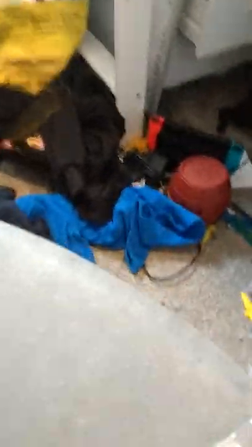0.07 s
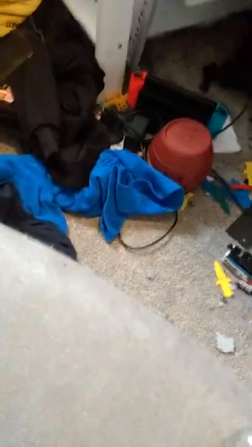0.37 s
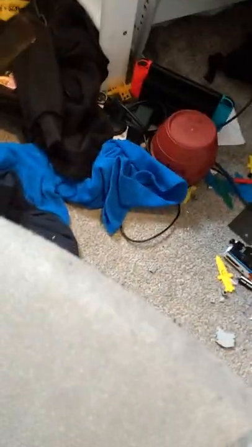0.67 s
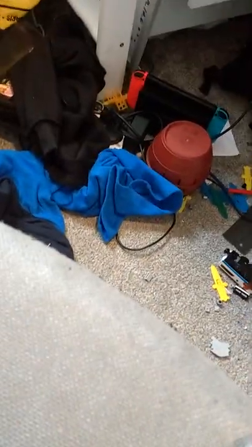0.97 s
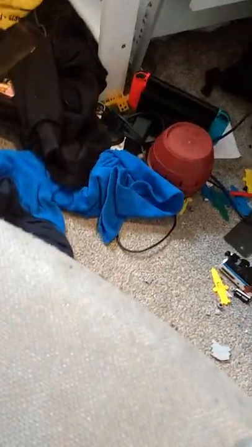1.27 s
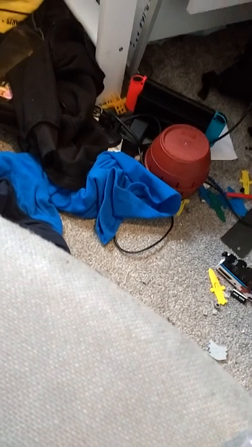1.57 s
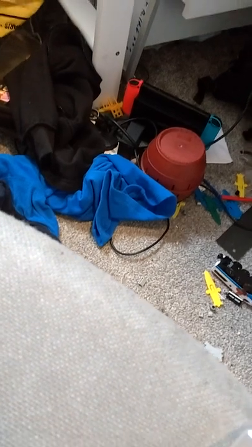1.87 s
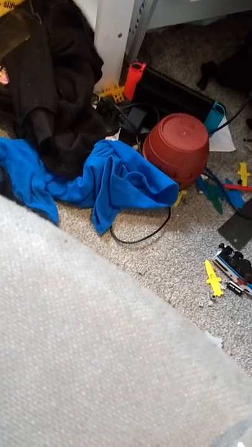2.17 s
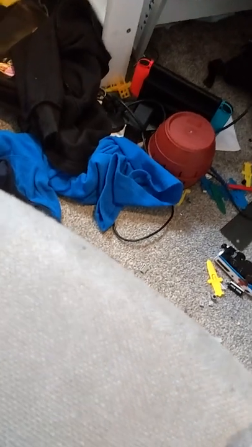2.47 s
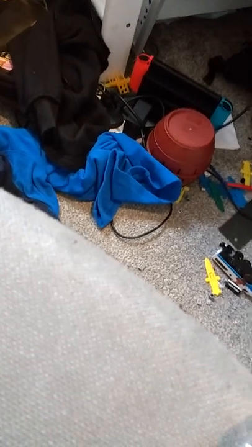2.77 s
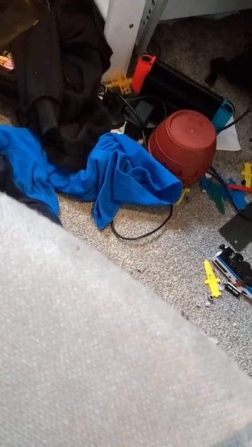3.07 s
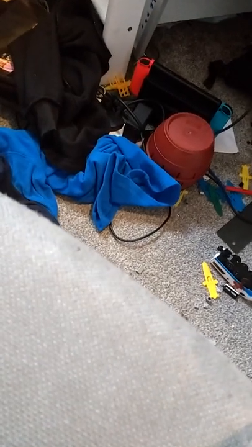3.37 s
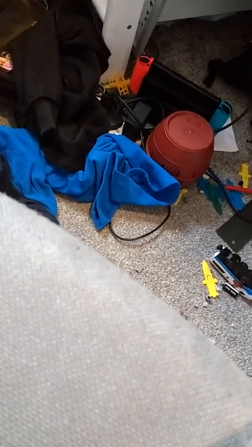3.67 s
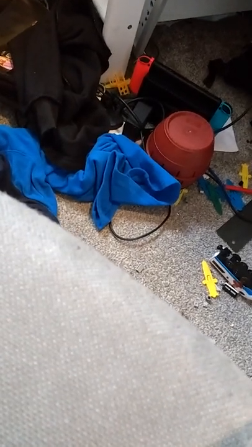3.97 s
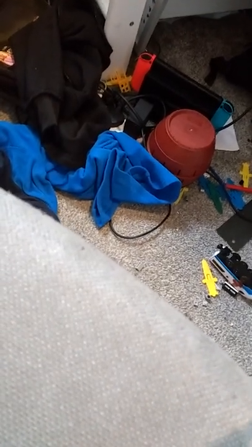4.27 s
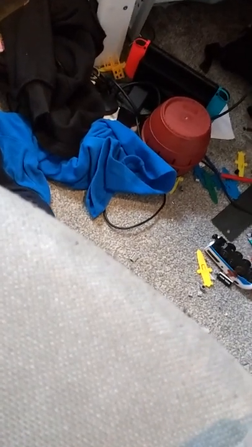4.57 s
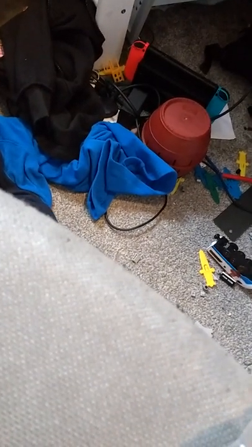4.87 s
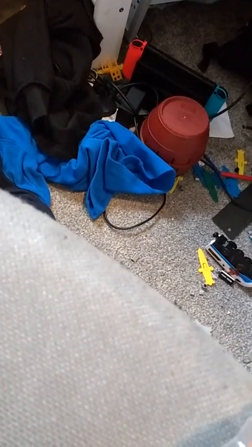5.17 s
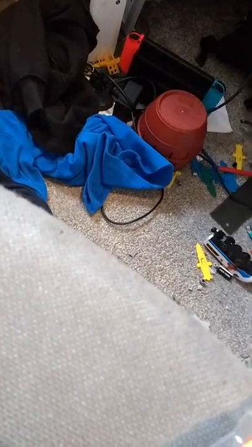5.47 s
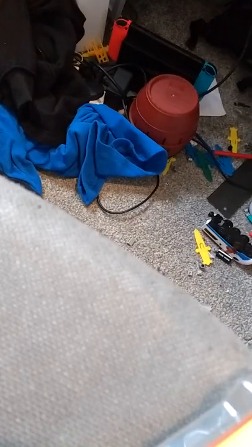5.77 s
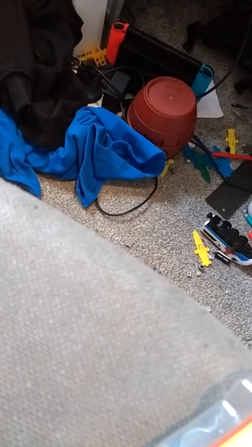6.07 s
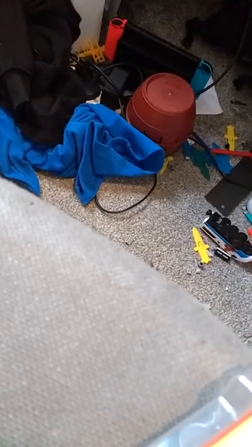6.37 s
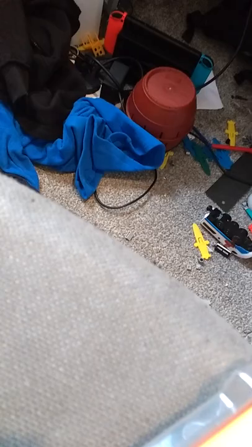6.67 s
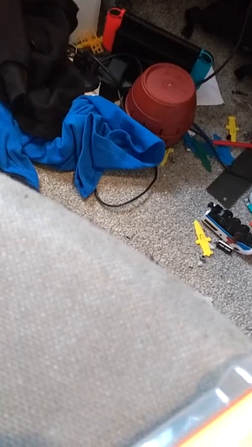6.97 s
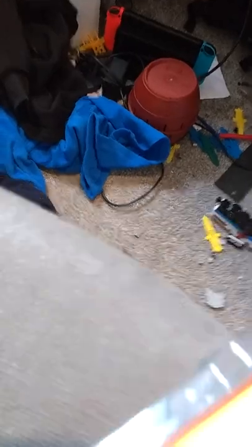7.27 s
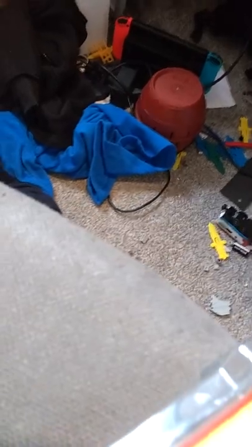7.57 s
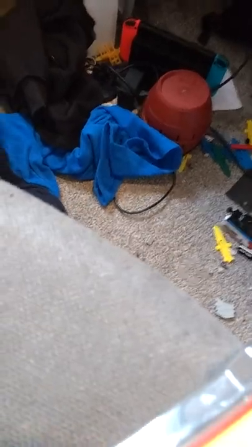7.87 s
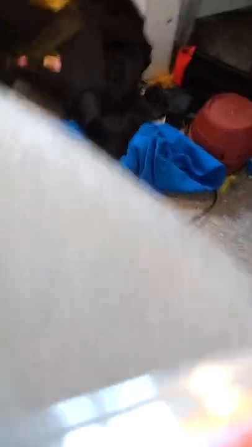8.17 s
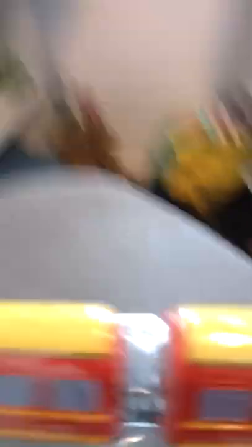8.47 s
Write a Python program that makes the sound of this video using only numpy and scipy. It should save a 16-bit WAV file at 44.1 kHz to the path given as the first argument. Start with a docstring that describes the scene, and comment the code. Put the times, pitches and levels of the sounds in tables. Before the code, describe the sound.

A clear plastic blister pack is handled close to the microphone, slightly to the right, in a small carpeted room with short echoes and faint background noise. It opens with a click, a soft hollow bump and fingers rubbing. Separate sharp snaps follow from about 0.5 to 1.8 seconds, each at a different pitch, some with a hollow knock. A brief, faint squeak comes near 1.9 seconds, then a run of crackling from 2 to 3 seconds. The handling eases until a sharper, louder click at about 3.8 seconds. Another cluster of crackles follows from 4 to 4.7 seconds, then a few light ticks, and bright crinkling around 5.4 to 5.9 seconds. From about 6.5 seconds the crackling grows busier, with a strong snap near 7.2 and a dense flurry around 8.1. A last couple of snaps and a soft bump come at about 8.4 seconds.

```python
"""A clear plastic blister pack snaps and crackles as it turns in a hand, close to two microphones.
Small flat patches of its shell (facets) buckle, ring at their own pitch and shake the hollow pack.
Between snaps, sliding fingers set tiny creases crackling, bump the pack and make it squeak once.
The small carpeted room adds short echoes, and faint background noise lies under it all."""
import sys
import numpy as np
from scipy import signal
from scipy.fft import rfft, irfft
from scipy.io import wavfile
from scipy.ndimage import uniform_filter1d

SR = 44100
rng = np.random.default_rng(int(sys.argv[2]) if len(sys.argv) > 2 else 0)


def master(y):
    """Save y as 16-bit WAV."""
    cut = np.clip(np.atleast_2d(y).T, -1, 1)
    pcm = np.round(cut * 32767)  # scale
    wavfile.write(sys.argv[1], SR, pcm.astype(np.int16))


N = 374982

# one buckling facet a row: t/s, level/dB, f/Hz, thump/dB, fizz/dB, side (1 right, -1 left)
# thump (the lows) and fizz (the highs) are counted from the row's level
SNAPS = [(0.1014, -27, 1660, 0, -1, 1), (0.2634, -38.5, 900, 2, -20, 1), (0.276, -29.5, 2680, -9, -14, 1),
         (0.51, -28.5, 700, -14, -38, 1), (0.5147, -25.5, 1185, -4, -41, 1),
         (0.5319, -38.5, 1490, 9, -11, 1), (0.548, -33.5, 1040, -6, -18, 1),
         (0.5798, -38.5, 1370, 6, -18, 1), (0.6052, -29, 1000, -10, -28, 1), (0.6263, -52, 1240, 0, 3, 1),
         (0.882, -45, 1090, 7, -18, 1), (0.9138, -37, 800, 5, -16, 1), (0.935, -22.5, 2900, -1.5, -11, 1),
         (0.9427, -30, 1270, -20, -5.5, 1), (0.97, -37, 700, -1, -25, 1), (1.1213, -36.5, 1900, 1, -13, 1),
         (1.1363, -23.0, 1860, -8, -18, 1), (1.2101, -35, 825, -4, -16, 1),
         (1.2348, -21.5, 1004, -6, -25, 1), (1.32, -43, 780, 5, -22, 1), (1.3374, -21, 1920, -0.5, -6.5, 1),
         (1.457, -47, 1900, -7, -19, 1), (1.5535, -29.5, 2440, -12, -7, 1),
         (1.5744, -37.5, 1800, -4, -9, 1), (1.5805, -29, 600, -7, -21.5, 1), (1.6015, -45, 2400, 0, -4, 1),
         (1.7532, -23, 1320, -11, -5, 1), (1.778, -41.5, 1300, 11, 1, 1), (1.8031, -39, 1160, 3, -10, 1),
         (1.8164, -28, 777, -5, -8.5, 1), (1.8992, -43, 800, 0, -18, 1), (2.0021, -31, 3300, -7, -19, 1),
         (2.0386, -24, 2930, -10, -22, 1), (2.062, -24.5, 3140, -0.5, -17, 1),
         (2.0901, -29, 3100, -28, -4.5, 1), (2.146, -24.5, 760, -8, -7, 1), (2.1609, -26, 2180, -22, 1, 1),
         (2.1729, -35, 2300, -12, -5, 1), (2.1865, -34, 3080, -24, -10, -1),
         (2.231, -32.5, 1350, -11, -13, -1), (2.2408, -37.5, 1150, -8, -12, 1),
         (2.247, -39, 1345, -22, -7, 1), (2.26, -33.5, 1350, -2, 0.5, 1), (2.3024, -32, 1390, -20, -6.5, 1),
         (2.3259, -32.5, 750, -4, -3, 1), (2.35, -31, 2430, -13, -4, 1),
         (2.3645, -28.5, 3140, -14, -11, -1), (2.3747, -35, 3370, -13, -6, 1),
         (2.3853, -35, 2560, -20, -12, 1), (2.3915, -33, 3530, -11, -20, 1), (2.414, -46, 2140, 6, -21, 1),
         (2.4764, -29.5, 1900, -13, -3, 1), (2.5442, -39, 2160, -5, -15, 1), (2.5578, -47, 3640, -6, -8, 1),
         (2.5739, -34.5, 2170, -8, -27, 1), (2.5779, -37, 2050, -6, -17, 1),
         (2.5895, -40, 3100, -4, -12, 1), (2.6079, -34, 1110, -4, -18, 1), (2.621, -38, 2800, -16, -12, 1),
         (2.6322, -29, 2320, -12, -6, 1), (2.646, -33.5, 2700, -20, -10, 1),
         (2.658, -36, 2900, -12, -12, 1), (2.725, -27, 1180, -21, -36, 1), (2.768, -40, 646, -3, -19, 1),
         (2.788, -42, 2400, 9, -19, 1), (2.7942, -30, 2200, -7, -29, 1), (2.8945, -40, 2270, 4, -24, 1),
         (2.917, -36.5, 2390, 2, -28, 1), (2.937, -37.5, 2230, -4, -19, 1),
         (3.0154, -33.5, 2880, -24, -8.5, 1), (3.148, -44, 1790, -5, -41, 1),
         (3.451, -34.5, 640, -21, -28, 1), (3.4612, -37.5, 1370, -4, -36, 1),
         (3.553, -43.0, 520, -4, -16, 1), (3.5824, -33.5, 3460, -32, -5, 1),
         (3.6013, -39.5, 1480, 5, -11, 1), (3.7508, -17.5, 1250, -3.5, -15.5, 1),
         (3.928, -38, 930, -3.5, -20, 1), (4.0026, -31.0, 1270, -35, -10.5, 1),
         (4.023, -43, 1370, 0, -12, 1), (4.0519, -27.5, 1090, -3.5, -37, 1),
         (4.136, -36.5, 1500, 3.5, -27, 1), (4.173, -26, 1270, -11, -23, 1), (4.187, -40, 2600, -10, -4, 1),
         (4.2177, -26, 2430, -21, -17, 1), (4.242, -24, 2250, -27, -9, 1),
         (4.2601, -24, 2030, -21, -6.5, 1), (4.2796, -32, 3200, -11, 0, -1), (4.2874, -24, 2500, -6, -7, 1),
         (4.336, -27, 2410, -5, -6, 1), (4.3835, -26.5, 1410, -5, -3.5, 1),
         (4.4203, -33, 2670, -27, -8.5, 1), (4.4566, -45, 2140, -4, -3, 1), (4.473, -32, 2680, -4, -15, 1),
         (4.5017, -45, 1900, -3, -9, 1), (4.5204, -39.5, 1330, -12, -7, 1),
         (4.5324, -42.5, 1100, -8, -11, 1), (4.551, -41, 920, -14, -20, 1),
         (4.566, -37.5, 2950, -3, -30, 1), (4.5835, -46.5, 1900, 0, -20, 1),
         (4.5944, -43.5, 1910, -5, -13, 1), (4.6174, -40, 2460, 3, -17, 1),
         (4.637, -23.5, 1650, -18, -14, 1), (4.6476, -27.5, 1940, -0.5, -3, 1),
         (4.782, -41.5, 3400, -27, -7, 1), (4.843, -33.5, 2180, -14, -3, 1),
         (4.9256, -60, 3120, -12, 17.5, 1), (4.9771, -34.5, 740, -2, -4, -1),
         (4.9873, -37.5, 2200, -8, -7, 1), (5.079, -40, 1220, -16, -11, 1), (5.0916, -38, 814, -4, -17, -1),
         (5.2785, -47, 1870, -16, -32, 1), (5.3152, -42, 856, -13, -26, 1),
         (5.348, -37.5, 1150, -9, -16, 1), (5.3545, -29.5, 3240, -24, -9.5, 1),
         (5.3696, -38, 3000, -15, -10, 1), (5.375, -31.5, 3080, -25, -3, -1),
         (5.4375, -38, 1700, -8, -3, 1), (5.44, -25, 2910, -33, -6.5, 1), (5.4661, -31.5, 930, -1, -2, 1),
         (5.49, -41, 2900, 0, 8, 1), (5.4968, -39.5, 1940, -2, 8, 1), (5.5149, -44, 1610, 9, -5, 1),
         (5.537, -30.5, 2600, -21, -6, 1), (5.558, -38, 1870, -6, -4, 1), (5.565, -33, 2400, -10, -6, 1),
         (5.5867, -28, 740, 1.5, -15, 1), (5.6276, -44, 2170, -3, -1, 1), (5.6826, -37, 2840, -7, -3, 1),
         (5.6893, -25, 3050, -27, -6, 1), (5.7, -28, 3270, -23, -5.5, -1),
         (5.7083, -36.5, 4250, -21, 10.5, 1), (5.7955, -44, 700, -7, -20, 1), (5.804, -41, 1690, -8, -8, 1),
         (5.84, -40, 1570, -5, -8, 1), (5.8567, -36.5, 1270, -1, -3, 1), (5.8717, -33.5, 2020, -9, -3, 1),
         (5.8842, -38.5, 1700, -17, -2, -1), (5.9542, -43, 1100, -5, -12, 1),
         (6.007, -48, 3570, -25, 4, -1), (6.1329, -40.5, 3400, 0, 5.5, 1),
         (6.1469, -35.5, 1700, -2, -11, 1), (6.2824, -41, 1870, -7, -14, 1),
         (6.2939, -43.5, 1200, -3, -14, 1), (6.327, -53, 1310, -12, -23, 1),
         (6.3851, -39, 1710, -21, -17, 1), (6.396, -39, 905, -7, -11, 1), (6.4425, -43, 2470, -5, -3, 1),
         (6.461, -36, 1740, -25, -5, 1), (6.4659, -33.5, 1700, -10, -9, 1),
         (6.4885, -28.5, 710, -1, -16, 1), (6.5255, -27, 1950, -33, -2.5, -1),
         (6.54, -29, 1270, -31, -2.5, -1), (6.6143, -35.5, 1270, -5, 6, -1),
         (6.6513, -37.5, 1870, -15, -2.5, 1), (6.666, -38.5, 1240, -23, 2, 1),
         (6.6794, -40, 1720, -19, -7, 1), (6.717, -42, 1600, -2, -9, 1), (6.7558, -44, 1900, -9, -9, 1),
         (6.7613, -42.5, 900, -8, -16, 1), (6.7788, -47, 2000, -3, 0, 1), (6.7865, -45, 1900, -9, -2, 1),
         (6.7996, -32.5, 2130, -21, -3, 1), (6.8246, -33.5, 2160, -25, -7, 1),
         (6.844, -46, 3160, -15, 1, 1), (6.8554, -38, 1660, -18, -5, 1), (6.8657, -39.5, 1700, -8, -9, 1),
         (6.881, -49, 2400, -16, 1, 1), (6.891, -33.5, 1880, -34, -5.5, 1), (6.925, -49, 1870, 2, 1, 1),
         (6.9574, -24.5, 1640, -36, -8.5, 1), (6.9736, -26.5, 1980, -10, -5, 1),
         (6.9844, -29.5, 1090, 0, 2, 1), (7.0209, -31.5, 2600, -9, -5, 1), (7.0349, -32, 3300, -23, -6, 1),
         (7.0444, -39, 2400, -6, -4, 1), (7.0654, -41, 3450, -7, -1, 1), (7.1118, -36.5, 800, 2, -11, -1),
         (7.1192, -32.5, 1000, -8, -14, 1), (7.1389, -30, 1250, 0, -8, 1), (7.148, -29, 1700, -4, -7, 1),
         (7.158, -19, 1350, -9, -8, 1), (7.188, -27.5, 1700, -15, -11, 1), (7.2065, -34, 3520, -10, -8, 1),
         (7.222, -35, 2400, -5, -3, 1), (7.2392, -34.5, 2560, 0.5, 3, 1), (7.2557, -34, 2080, -4, -5, 1),
         (7.3173, -42.5, 1980, 1, -5, 1), (7.3322, -34.5, 3000, -23, -13, 1),
         (7.366, -34.5, 2900, -15, -6.5, 1), (7.4025, -36.5, 2900, -13, -8, 1),
         (7.4174, -51, 2200, -1, -6, 1), (7.482, -37, 2390, -10, -7, 1), (7.507, -32.5, 1920, 3.5, -4.5, 1),
         (7.523, -38, 1900, -3, -12, 1), (7.532, -37, 2080, -9, -12, 1), (7.544, -33.5, 2300, -8, -12, 1),
         (7.559, -37, 2220, -2, -14, 1), (7.5781, -38.5, 2930, 1, 6, 1), (7.6242, -32, 1510, 0, -5.5, 1),
         (7.6589, -29.5, 1200, -3, -16, 1), (7.6702, -31.5, 1350, -7, -13, 1),
         (7.6769, -25, 2900, -7, -6.5, 1), (7.711, -30.5, 1200, -1.5, -5, -1),
         (7.7218, -31.5, 2680, -18.5, -0.5, 1), (7.75, -37.5, 1810, -25, -2, 1),
         (7.802, -34, 1330, -1, -6.5, 1), (7.8382, -37, 1700, 1, -13, 1), (7.8548, -27.5, 1440, 3, -0.5, 1),
         (7.887, -32.5, 1550, -8, -26, 1), (7.907, -35, 1400, -1, -7.5, 1),
         (7.9241, -30, 3250, -14, -21, 1), (7.9392, -31.5, 2730, -18, -7.5, 1),
         (7.9571, -31, 1320, -18, -9, 1), (7.982, -42.5, 2200, 4, 5, 1), (8.001, -29.5, 784, -18, -10.5, 1),
         (8.0312, -36, 1860, -4, -4.5, 1), (8.0511, -22.5, 3020, -19, -7, 1),
         (8.0767, -27, 2020, -2.5, -9, 1), (8.0894, -23, 900, -1.5, -5, 1),
         (8.0973, -26.5, 1700, -8, -5, 1), (8.1117, -25, 940, 2, -1, 1), (8.1172, -27, 1900, -5, -7, 1),
         (8.127, -24.5, 1350, -5, -5, 1), (8.1552, -24, 1700, -8.5, -11.5, 1),
         (8.186, -31.5, 1500, -4, -10, 1), (8.211, -34, 1980, 0, -15, 1), (8.2353, -31, 1410, 6.5, -1, 1),
         (8.3414, -43, 1400, 9, -22, -1), (8.3539, -27.5, 1380, 5, -6.5, 1), (8.362, -22, 1295, -1, -9, 1),
         (8.414, -38.5, 726, 6, -11, 1)]
# borders of four pitch zones, called body, shell, crack and fizz from low to high: f/Hz
EDGES = [70, 500, 2000, 6000, 16500]
# how strongly the shell gives off each pitch: f/Hz, level/dB
SHELL = [(70, 2), (170, 2.5), (480, 3.4), (720, 4.3), (1020, 0.5), (1400, 1), (1900, -2), (2400, -4.4),
         (3100, -2.6), (4000, -7.6), (4800, -9.8), (7200, -13), (9300, -10.5), (12000, -18.5),
         (15500, -24.5)]
# above this level a facet gives way fold by fold: a weaker first flip, a stronger overtone
BIG_SNAP_DB, FLIP_LOSS_DB_PER_DB, OVERTONE_DB_PER_DB = -24, 1.5, 1.6


def snaps(flip_db=14.5, beam_db=0.8, spread=0.95, dry_db=11, size=8000):
    """A facet flips, rings at its own pitch and shakes the shell, then the room."""
    # how each zone fades (t60 is the time to fall 60 dB): ring t60/s, room/dB, room t60/s, trim/dB
    decay = [(0.11, -13.5, 0.46, -5), (0.044, -14, 0.05, 0.4), (0.027, -9.5, 0.089, -2.3),
             (0.014, 1.5, 0.07, -4.4)]
    rows, t = np.array(SNAPS), np.arange(size) / SR
    count, zones_db = len(rows), snap_zones_db()
    near, far = rng.standard_normal((count, size)), rng.standard_normal((count, 2, size))
    # the fizziest snaps face the microphones: they are harder, drier and brighter
    facing = np.clip((zones_db[3] - zones_db[2] + 9) / 11, 0, .95)[:, None, None]
    pitch, excess_db = rows[:, 2:3], np.maximum(rows[:, 1:2] - BIG_SNAP_DB, 0)
    flip = flips(facing.ravel(), size) * from_db(flip_db - FLIP_LOSS_DB_PER_DB * excess_db)
    puff = from_db(-5) * ring(t, hz=300, t60=0.008)   # air pushed aside by the facet
    strike = flip + facet_ring(t, pitch, excess_db) + puff + body_ring(t, count)
    room_rise = 1 - np.exp(-t / 0.0083)   # the room answers after the direct sound
    sounds, onset = 0, round(.01 * SR)   # the first 10 ms set a snap's level
    for k, (ring_t60, room_db, room_t60, trim_db) in enumerate(decay):
        fade = from_db(-60 * t / ring_t60)
        room = from_db(room_db - 60 * t / room_t60) * room_rise
        zone = mic_pair(strike + near * fade) + far * from_db(-dry_db * facing) * (spread * fade + room)
        zone *= from_db(beam_db * k * rng.standard_normal((count, 2, 1)))   # highs beam more unevenly
        zone = (1 - facing) * zone + facing * np.diff(zone, prepend=0)
        zone = band(colour(zone, SHELL), EDGES[k], EDGES[k + 1])
        gain = from_db(zones_db[k] + trim_db) / np.sqrt(np.mean(zone[..., :onset] ** 2, axis=(1, 2)))
        sounds += (-1) ** k * gain[:, None, None] * zone   # alternate signs leave no gap between zones
    out = np.zeros((2, N))
    for (start, *_, side), sound in zip(rows, sounds):
        add(out, start, sound if side > 0 else sound[::-1])
    return out


def flips(facing, size, rebound=0.56, second_fold=0.7, facing_db=9):
    """A facet flips and springs back within a millisecond; in duller snaps a second fold follows."""
    count = len(facing)
    flip, rows = np.zeros((count, size)), np.arange(count)
    flip[:, 2] = 1
    flip[rows, (rng.uniform(.00015, .0008, count) * SR).astype(int)] = -rebound
    flip[rows, (rng.uniform(.0009, .002, count) * SR).astype(int)] += second_fold * (1 - facing)
    return flip * (from_db(facing_db * facing) * rng.choice([-1, 1], count))[:, None]


def facet_ring(t, pitch, excess_db, overtone_ratio=2.36, fold_tones=6):
    """A facet rings at its pitch and one overtone; its fold adds a few short, high tones."""
    t60 = 0.018 * np.sqrt(np.median(pitch) / pitch)   # small, high facets fade sooner
    overtone = ring(t, overtone_ratio * pitch, t60=0.0097)
    sound = from_db(-5) * ring(t, pitch, t60) + from_db(-7.5 + OVERTONE_DB_PER_DB * excess_db) * overtone
    fold_hz = np.exp(rng.uniform(np.log(2800), np.log(14000), (len(pitch), fold_tones)))
    short = len(t) // 8
    for k in range(fold_tones):
        sound[:, :short] += (-1) ** k * from_db(-3) * ring(t[:short], fold_hz[:, k:k + 1], t60=0.0055)
    return sound


def body_ring(t, count, scatter_db=5, detune=0.059):
    """The whole hollow pack rings; the changing grip shifts its tones from snap to snap."""
    # the pack's own tones: f/Hz, level/dB, t60/s
    body_tones = [(182.3, -26.5, 0.21), (339, -40.5, 0.12), (460.6, -23.5, 0.093), (687, -38.5, 0.14),
                  (835, -31.5, 0.19)]
    out = 0
    for hz, db, t60 in body_tones:
        gain = from_db(db + scatter_db * rng.standard_normal((count, 1)))
        pitch = hz * (1 + detune * rng.standard_normal((count, 1)))
        out += gain * ring(t, pitch, t60)
    return out


def snap_zones_db(even_hz=1870, crack_db_per_octave=8.5):
    """Each snap's level in the four zones: higher facets give more crack and less shell."""
    _, level, pitch, thump, fizz, _ = np.transpose(SNAPS)
    tilt = crack_db_per_octave * np.log2(pitch / even_hz)
    shell = level - 10 * np.log10(1 + from_db(tilt) ** 2)
    crack = shell + tilt + np.maximum(level - BIG_SNAP_DB, 0) * OVERTONE_DB_PER_DB / 2
    return np.array([level + thump, shell, crack, level + fizz])


def turning(x, top_hz=11800):
    """A snap's highest treble travels in a beam, so it comes and goes as the pack turns."""
    # boost or cut of that treble: t/s, level/dB
    top_db = [(0, -5), (1.5, 5.5), (2.2, 10.5), (4.4, 11), (5, -8), (6.4, 2), (8.5, 2.5)]
    top = signal.sosfiltfilt(signal.butter(2, top_hz, "high", fs=SR, output="sos"), x)
    return x + (gain_curve(top_db) - 1) * top


def rubbing():
    """Sliding fingers shake the body and shell, and set the small creases crackling."""
    low = creases(per_s=500, size_db=3.5, t60=0.023, spread=0.25, range_hz=(550, 1700), tone_db=-14.5)
    high = creases(per_s=750, size_db=4.2, t60=0.005, spread=0.7, range_hz=(1900, 5800), tone_db=-4)
    gains = [shaking(k) for k in range(4)]
    zones = zip(gains, (low, low, high, high), EDGES, EDGES[1:])
    crackle = sum(gain * rms_one(band(slips, low_hz, high_hz)) for gain, slips, low_hz, high_hz in zones)
    return crackle + ticks(force=gains[2])


def shaking(k, attack_s=0.018, release_t60=0.076, settle_rise_s=0.0027):
    """How hard zone k is shaken by finger strokes, and by creases settling after each snap."""
    # fingers slide over the pack and flex it: t/s, length/s, level/dB, extra body/dB, brightness/dB
    strokes = [(0.17, 0.24, -39, 17, -6.5), (0.4, 0.47, -50.5, 5, -4), (0.498, 0.12, -45, 12.5, -1.5),
               (0.873, 0.096, -44.5, 8, -3), (1.121, 0.05, -34.5, 7.5, -3.5), (1.218, 0.1, -49, 10, -2),
               (1.556, 0.18, -60.5, 17, 1.5), (1.781, 0.048, -49, 14.5, 2.5), (1.853, 0.21, -39, 16.5, -5),
               (2.025, 0.14, -40, 12, -4), (2.25, 0.08, -67, -15, -8), (2.351, 0.071, -43.5, 10, -3),
               (2.588, 0.079, -50, 3.5, 0.5), (2.776, 0.029, -34, 12, -6), (2.893, 0.258, -57, 5, -.7),
               (3.684, 0.04, -54, 15, -1), (3.74, 0.015, -40.5, 5, -1), (4.025, 0.04, -33.5, 1.5, -6.5),
               (4.153, 0.086, -41, 9, -1.5), (4.238, 0.089, -42, 12, -1.5), (4.36, 0.18, -50, 5, -0.5),
               (4.614, 0.055, -57, 13, 4), (4.988, 0.0058, -58, 11, 3.5), (5.358, 0.04, -47, -0.5, 1),
               (5.442, 0.076, -48, 3, 1.5), (5.548, 0.12, -59, 13, 1), (5.688, 0.059, -63, 5, 1.5),
               (5.83, 0.13, -42.5, -22, -3), (6.099, 0.1, -51, 1, -1.5), (6.242, 0.11, -46.5, 3, -2.7),
               (6.383, 0.051, -57, -6, 1.5), (6.477, 0.044, -30, 0, -1.5), (6.612, 0.31, -50.5, 3, 0.3),
               (6.949, 0.05, -39.5, -1, 1.2), (7.127, 0.14, -37.5, 5, 0.5), (7.323, 0.32, -57, 2, -1),
               (7.492, 0.11, -39.5, 4, -1.3), (7.62, 0.11, -36, 2, -1), (7.794, 0.23, -44, 6, 0),
               (8.055, 0.15, -42, -1, 1.5), (8.224, 0.05, -52, -2, -2), (8.352, 0.04, -35, 6, -1.5)]
    # how each zone answers a stroke: level/dB, dB gained per dB of brightness
    rub_zones = [(-3, 3), (2.5, 2), (-1.8, 4.5), (-6.5, 5)]
    # settling creases in each zone: level against the snap/dB, t60/s
    settling = [(-5, 0.07), (-21, 0.072), (-28.5, 0.075), (-36, .07)]
    t, power = np.arange(SR // 2) / SR, np.zeros((1, N))
    (zone_db, bright_slope), (settle_db, settle_t60) = rub_zones[k], settling[k]
    swell = np.minimum(t / attack_s, 1) ** 2
    for start, length, level_db, body_db, bright_db in strokes:
        release = from_db(-60 * np.maximum(t - attack_s - length, 0) / release_t60)
        gain = from_db(level_db + zone_db + bright_slope * bright_db + body_db * (k == 0))
        add(power, start - attack_s, (gain * swell * release)[None] ** 2)
    settle = (1 - np.exp(-t / settle_rise_s)) * from_db(-60 * t / settle_t60)
    for (start, *_), snap_db in zip(SNAPS, snap_zones_db()[k]):
        add(power, start, (from_db(snap_db + settle_db) * settle)[None] ** 2)
    return np.sqrt(power[0])


def creases(per_s, size_db, t60, spread, range_hz, tone_db, count=12):
    """Tiny slips of uneven size each ring a facet near the moving finger."""
    t, out = np.arange(1024) / SR, 0
    slips = random_slips(per_s, size_db, limit=4)
    facet = (np.arange(N) // (SR // 20) + rng.integers(0, 2, N)) % count   # moves on every 50 ms
    for k, hz in enumerate(rng.permutation(np.geomspace(*range_hz, count))):
        tone = from_db(tone_db) * np.sin(2 * np.pi * hz * t)
        ringing = mic_pair(rng.standard_normal(len(t)) + tone) + spread * rng.standard_normal((2, len(t)))
        ringing *= from_db(-60 * t / t60)
        out += signal.oaconvolve((slips * (facet == k))[None], ringing, axes=-1)[:, :N]
    out = rms_one(out) + 0.055 * rng.standard_normal((2, N))
    loudness = np.sqrt(uniform_filter1d(np.mean(out ** 2, axis=0), SR // 25))
    return colour(out / loudness, SHELL)   # the level is evened out over 40 ms


def ticks(force, per_s=70, tick_db=-6, t60=0.023, count=6):
    """Lone creases let go with a dry tick, louder when the fingers work, faint while they rest."""
    # ticking under the resting grip: t/s, level/dB
    idle_db = [(0, -57), (1.2, -60), (1.45, -67), (1.9, -59), (2.5, -68), (3, -62), (4.8, -72), (6.2, -65),
               (8.5, -65)]
    t, out = np.arange(512) / SR, 0
    slips, facet = random_slips(per_s, size_db=-1.5, limit=3), rng.integers(0, count, N)
    for k in range(count):
        ringing = mic_pair(rng.standard_normal(len(t)) * from_db(-60 * t / t60))
        out += signal.oaconvolve((slips * (facet == k))[None], ringing, axes=-1)[:, :N]
    gain = from_db(tick_db) * force + gain_curve(idle_db)
    return gain * rms_one(band(colour(out, SHELL), low_hz=860, high_hz=11000))


def random_slips(per_s, size_db, limit):
    """Creases slip at random moments, each giving one tiny push or pull."""
    sizes = from_db(size_db * np.minimum(rng.exponential(1, N), limit)) * rng.choice([-1, 1], N)
    return sizes * (rng.random(N) < per_s / SR)


def bumps(rise_s=0.00033, neighbour_db=-11):
    """A push rings one tone of the pack and two weaker neighbours; the grip decides how long."""
    # finger bumps and big buckles: t/s, level/dB, f/Hz, t60/s
    pushes = [(0.169, -24, 119, .13), (0.172, -27, 70, .16), (0.18, -29, 185, .1), (0.937, -16.5, 400, .06),
              (0.938, -22.5, 87.4, .2), (0.945, -22, 480, .05), (1.138, -27, 1180, .04),
              (1.236, -16, 670, .04), (1.245, -27, 195, .13), (1.28, -35, 210, .12), (1.34, -39, 149, .16),
              (1.783, -21, 125, .17), (1.785, -17, 267, .08), (1.799, -22, 195, .12),
              (2.04, -27.5, 170, .14), (2.064, -31, 116, .2), (2.427, -32.5, 640, .04),
              (2.794, -22.5, 453, .06), (2.795, -34, 149, .16), (3.065, -34.5, 168, .15),
              (3.612, -32, 255, .08), (3.754, -20.5, 181.5, .08), (3.756, -26, 340, .21),
              (4.317, -22.5, 790, .03), (4.358, -23.5, 682, .036), (4.645, -27, 113, .2),
              (5.47, -30.5, 72, .3), (5.585, -39, 108, .22), (6.498, -37, 93, .25), (7.161, -32, 105, .2),
              (7.186, -24.5, 171, .14), (7.851, -23.5, 296, .08), (8.355, -26.5, 94, .25)]
    out, t = np.zeros((2, N)), np.arange(SR // 4) / SR
    for start, db, hz, t60 in pushes:
        below = ring(t, hz * rng.uniform(0.7, 0.77), t60)
        above = ring(t, hz * rng.uniform(1.063, 1.66), t60)
        swing = ring(t, hz, t60) + from_db(neighbour_db) * (below - above)
        add(out, start, mic_pair(from_db(db) * swing * (1 - np.exp(-t / rise_s))))
    return out


def squeak(hz=1360, width_hz=70, spread=0.34):
    """A fingertip drags unevenly and makes the shell sing at one pitch."""
    # the squeak swells and fades: t/s, level/dB
    swell = [(1.8, -73), (1.84, -39.5), (1.9, -46), (1.941, -43), (1.99, -58), (2.04, -83)]
    friction = mic_pair(rng.standard_normal(N)) + spread * rng.standard_normal((2, N))
    tone = signal.lfilter(*signal.iirpeak(hz, hz / width_hz, fs=SR), friction)
    return rms_one(tone) * gain_curve(swell, outside_db=-np.inf)


def walls(x, spread=0.28, smear_t60=0.0013, size=256):
    """The nearest walls send back echoes, smeared a little differently at each microphone."""
    # one echo a row: delay/s, level/dB, lowest f/Hz, highest f/Hz
    echoes = [(.0118, -16.5, 2020, 15000), (0.0233, -23, 400, 7000)]
    t, out = np.arange(size) / SR, x.copy()
    for delay_s, db, low_hz, high_hz in echoes:
        smear = (t == 0) + spread * rng.standard_normal((2, size)) * from_db(-60 * t / smear_t60)
        smear /= np.linalg.norm(smear, axis=1, keepdims=True)
        add(out, delay_s, from_db(db) * band(signal.oaconvolve(x, smear, axes=-1), low_hz, high_hz))
    return out


def background(spread=0.59):
    """Faint background noise, with a hiss that is strongest at first."""
    # tone of the noise: f/Hz, level/dB
    noise_tone = [(25, -18), (70, 3.5), (160, 6.5), (400, 0), (620, -1), (950, 1), (1500, -6.5),
                  (3000, -13), (6000, -17), (15000, -22.5)]
    # loudness of the noise: t/s, level/dB
    noise_db = [(0, -45), (.85, -47.5), (1.1, -51), (1.6, -50), (3.2, -53.8), (4.8, -57), (6.2, -54),
                (8.5, -49)]
    # loudness of the hiss: t/s, level/dB
    hiss_db = [(0, -52), (.8, -73), (1.5, -59), (2.2, -73), (8.5, -69)]
    noise = mic_pair(rng.standard_normal(N)) + spread * rng.standard_normal((2, N))
    hiss = band(colour(mic_pair(rng.standard_normal(N)), SHELL), low_hz=950, high_hz=7000)
    return gain_curve(noise_db) * rms_one(colour(noise, noise_tone)) + gain_curve(hiss_db) * rms_one(hiss)


def mic_pair(x, leak=0.33, direct_lag_s=0.00027, inverted_lag_s=0.00041):
    """A close sound on the right reaches the left channel twice: faintly, then upside down."""
    padded = np.concatenate([np.zeros(x.shape[:-1] + (SR // 1000,)), x], axis=-1)
    direct, inverted = (np.roll(padded, round(lag * SR), axis=-1)[..., -x.shape[-1]:]
                        for lag in (direct_lag_s, inverted_lag_s))
    return np.stack([leak * direct - inverted, x], axis=-2)


def ring(t, hz, t60):
    """A struck tone that fades by 60 dB in t60 seconds."""
    return np.sin(2 * np.pi * hz * t) * from_db(-60 * t / t60)


def from_db(db):
    """Turn decibels into a factor to multiply by."""
    return 10 ** (np.asarray(db) / 20)


def rms_one(x):
    """Scale a sound so that its average strength (rms) is 1."""
    return x / np.sqrt(np.mean(x ** 2) + 1e-20)


def gain_curve(points, outside_db=None):
    """Join (t/s, level/dB) points into a gain for every sample."""
    times, db = np.transpose(points)
    return from_db(np.interp(np.arange(N) / SR, times, db, left=outside_db, right=outside_db))


def colour(x, points, size=2048):
    """Shape the tone of a sound along (f/Hz, level/dB) points."""
    hz, db = np.transpose(points)
    grid = np.maximum(np.fft.rfftfreq(size, 1 / SR), 1)
    cepstrum = irfft(np.log(from_db(np.interp(np.log(grid), np.log(hz), db))))
    cepstrum[1:size // 2] *= 2   # minimum phase: nothing rings before the sound arrives
    cepstrum[size // 2 + 1:] = 0
    response = irfft(np.exp(rfft(cepstrum))).reshape((1,) * (x.ndim - 1) + (-1,))
    return signal.fftconvolve(x, response, axes=-1)[..., :x.shape[-1]]


def band(x, low_hz, high_hz):
    """Keep the pitches between two limits."""
    return signal.sosfilt(signal.butter(2, [low_hz, high_hz], "band", fs=SR, output="sos"), x + 1e-18)


def add(out, start_s, sound):
    """Mix a sound in at its start time."""
    i = max(round(start_s * SR), 0)
    out[:, i:i + sound.shape[-1]] += sound[:, :N - i]


def scene():
    """The pack in the hand, over faint background noise."""
    return walls(turning(snaps())) + rubbing() + squeak() + bumps() + background()


def record(dry, cutoff_hz=16000):
    """The left microphone is weaker and duller; peaks clip at full scale; the very top is cut."""
    # balance of the two microphones: f/Hz, left minus right/dB
    balance = [(60, 0.5), (300, -1.5), (720, -4.5), (1050, -3.5), (1450, 0), (2200, -4), (3100, -3),
               (4500, -4), (7000, -5), (9200, 5), (12000, -22), (15000, -3.5)]
    hz, lean_db = np.transpose(balance)
    right_db = 10 * np.log10(2 / (1 + from_db(lean_db) ** 2))
    left = colour(dry[0], np.c_[hz, right_db + lean_db])
    right = colour(dry[1], np.c_[hz, right_db])
    top_cut = signal.ellip(10, .2, 80, cutoff_hz, fs=SR, output="sos")
    return signal.sosfilt(top_cut, np.clip([left, right], -1, 1))


dry = scene()
out = record(dry)
master(out)
```